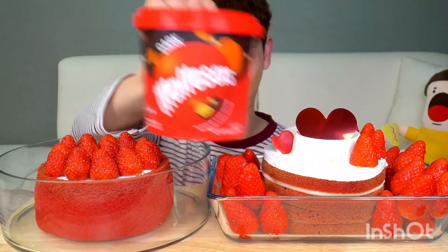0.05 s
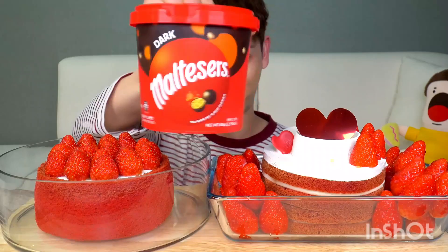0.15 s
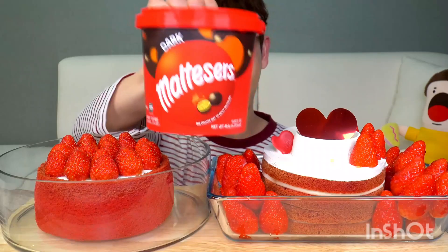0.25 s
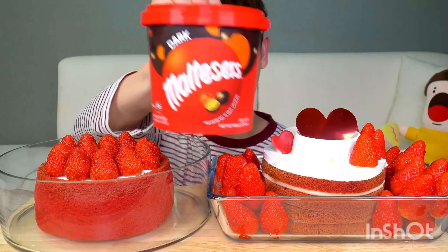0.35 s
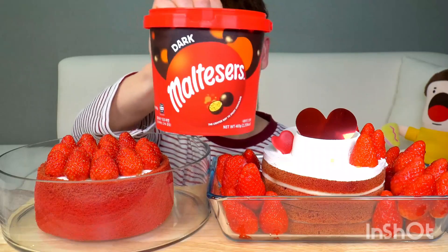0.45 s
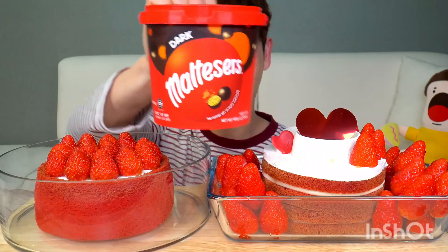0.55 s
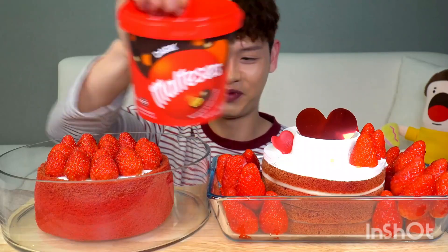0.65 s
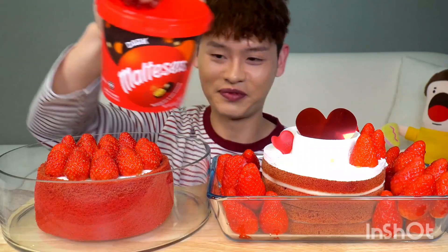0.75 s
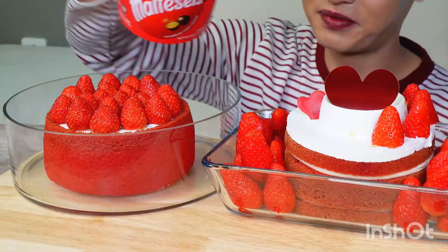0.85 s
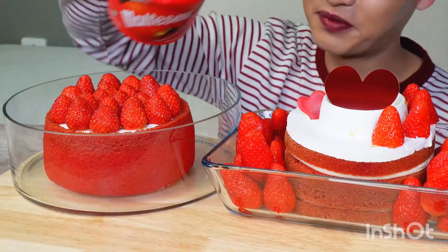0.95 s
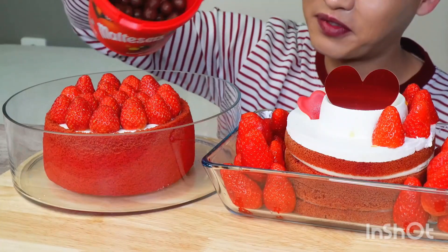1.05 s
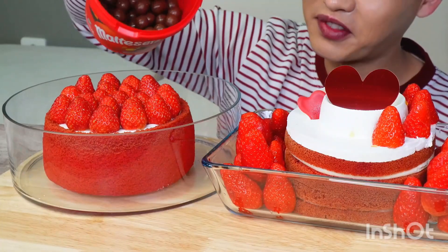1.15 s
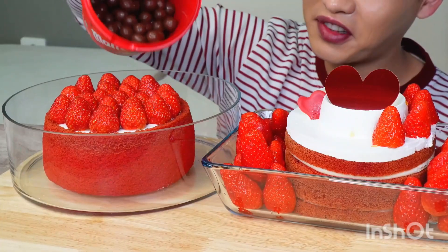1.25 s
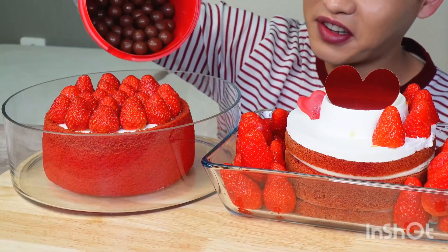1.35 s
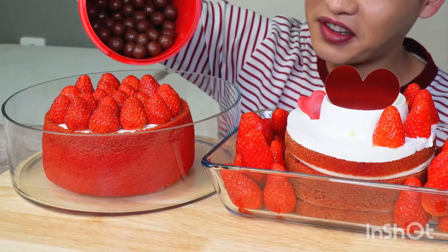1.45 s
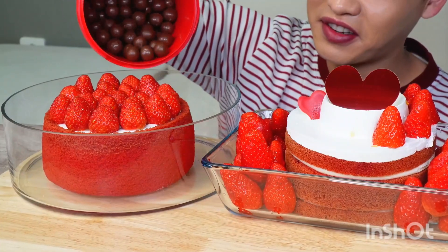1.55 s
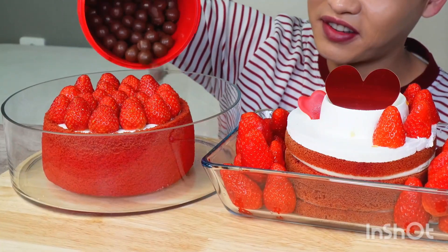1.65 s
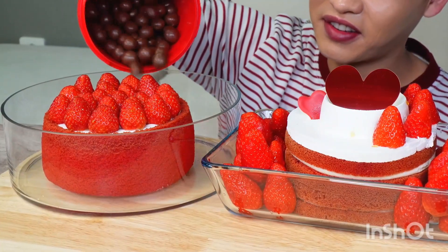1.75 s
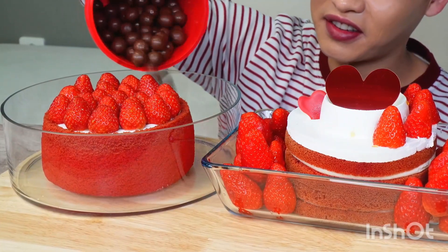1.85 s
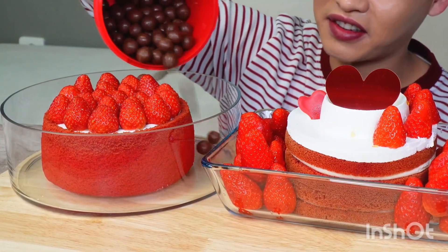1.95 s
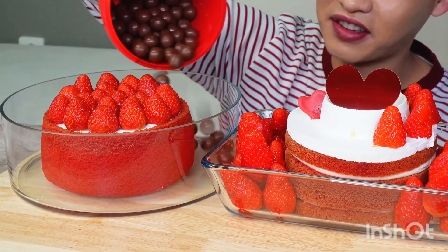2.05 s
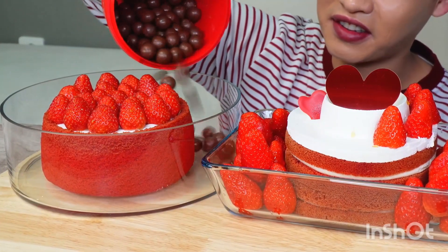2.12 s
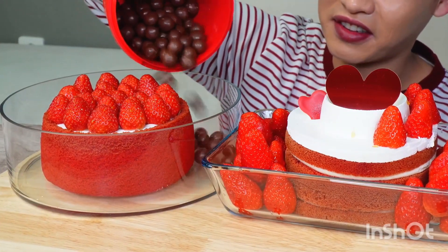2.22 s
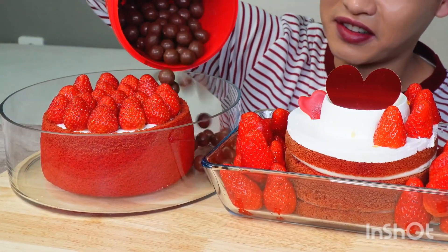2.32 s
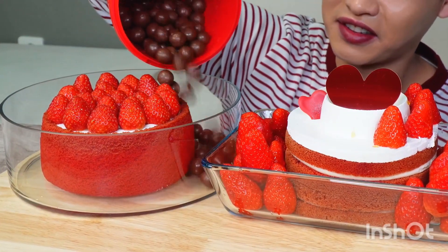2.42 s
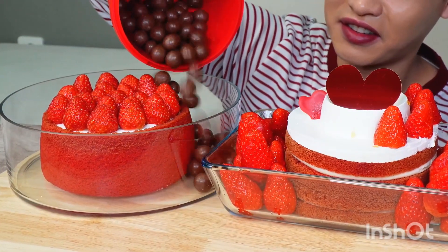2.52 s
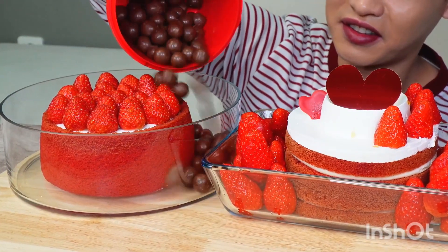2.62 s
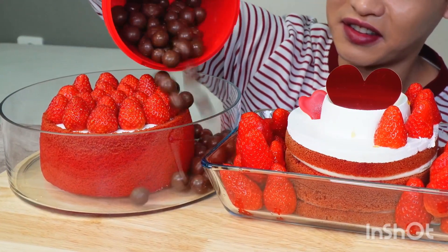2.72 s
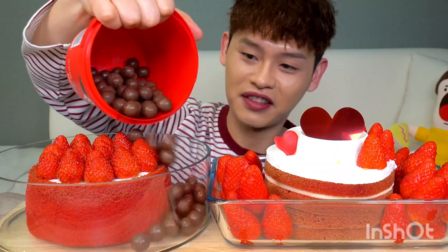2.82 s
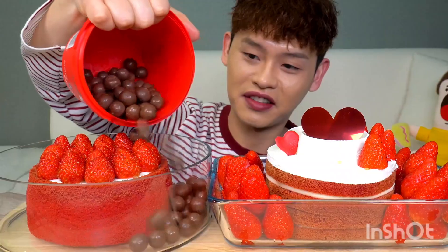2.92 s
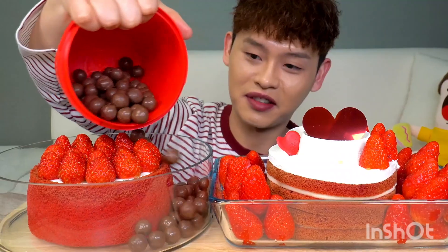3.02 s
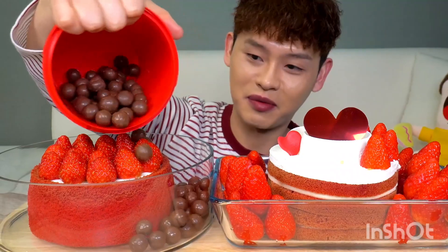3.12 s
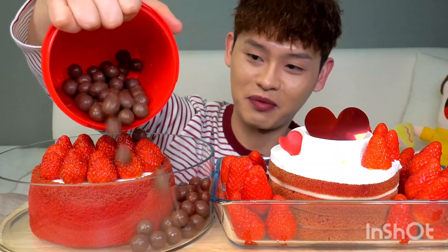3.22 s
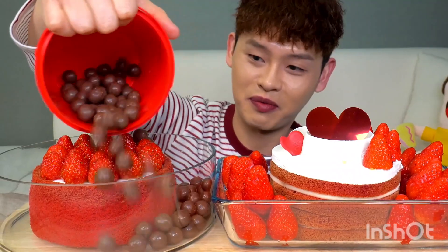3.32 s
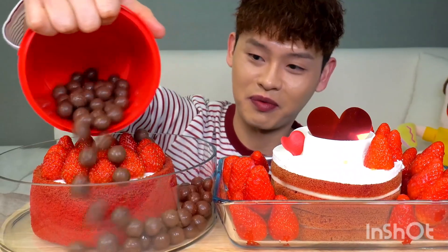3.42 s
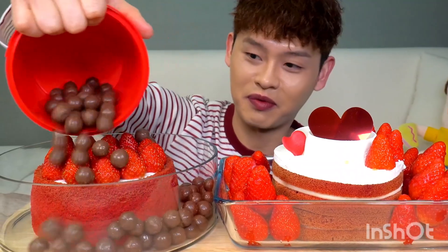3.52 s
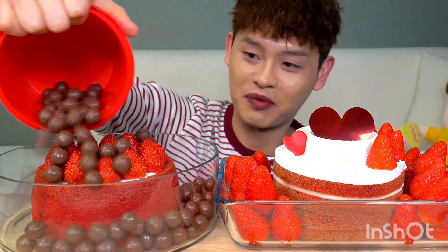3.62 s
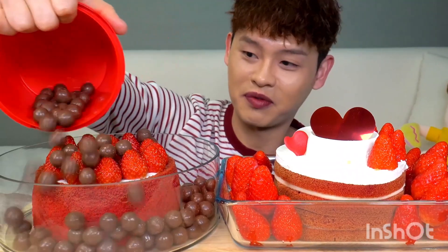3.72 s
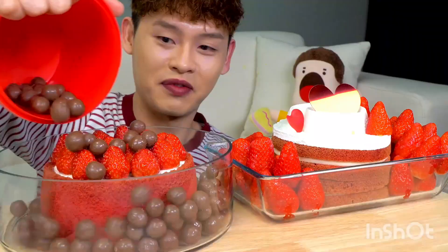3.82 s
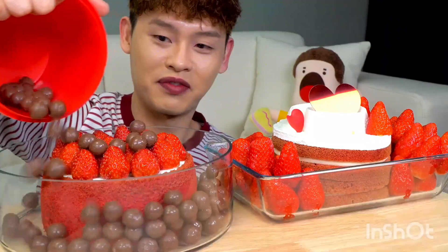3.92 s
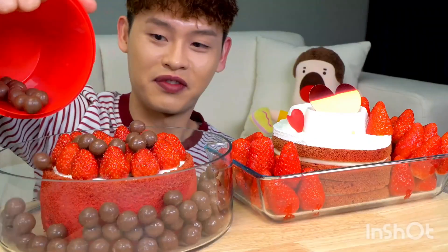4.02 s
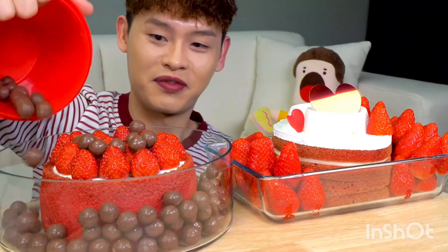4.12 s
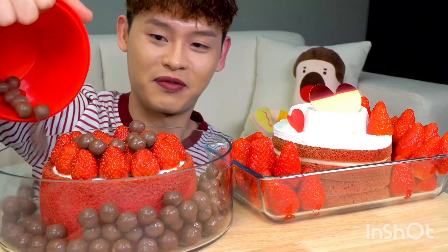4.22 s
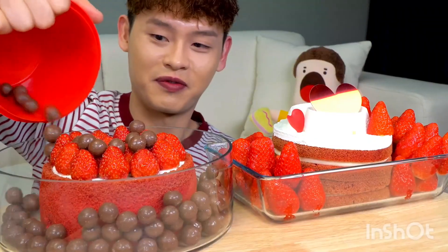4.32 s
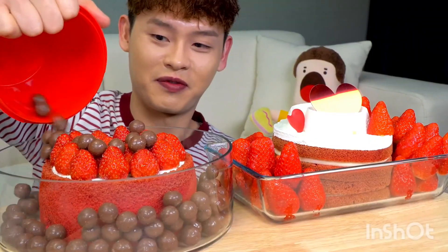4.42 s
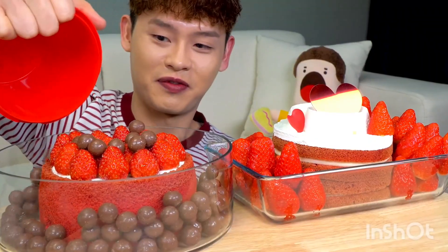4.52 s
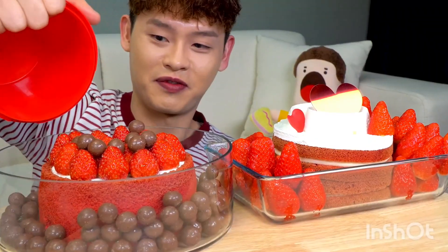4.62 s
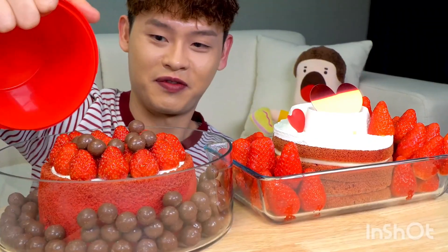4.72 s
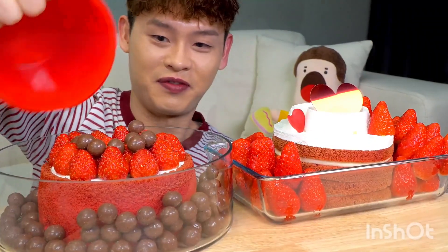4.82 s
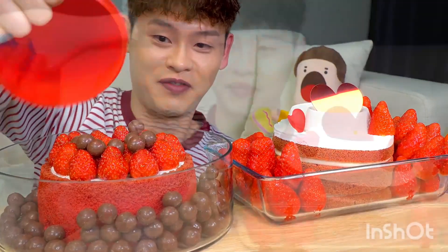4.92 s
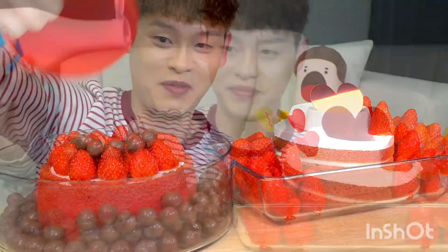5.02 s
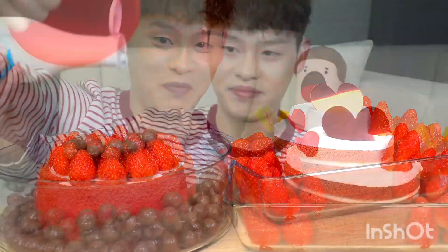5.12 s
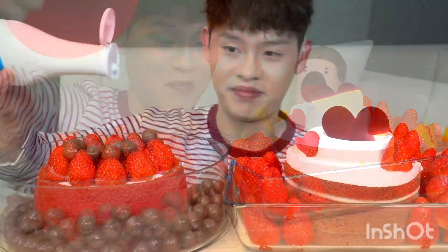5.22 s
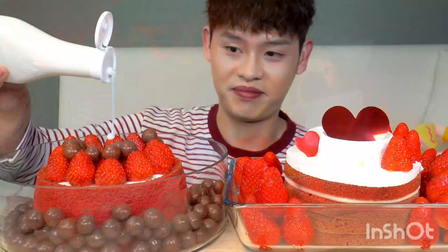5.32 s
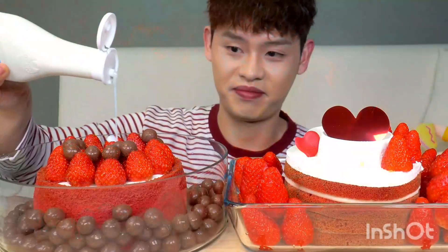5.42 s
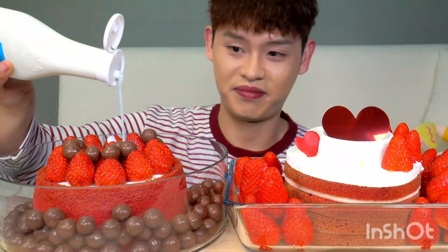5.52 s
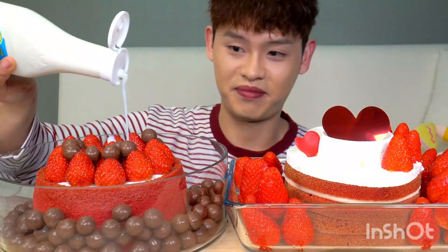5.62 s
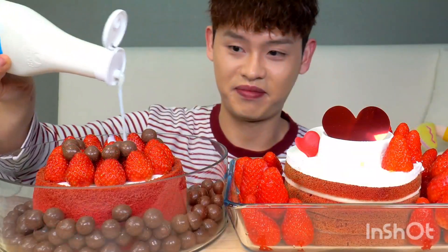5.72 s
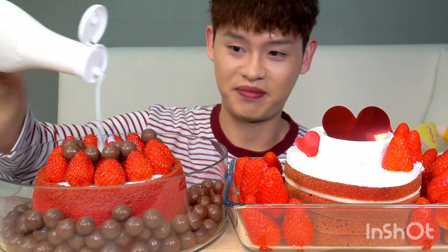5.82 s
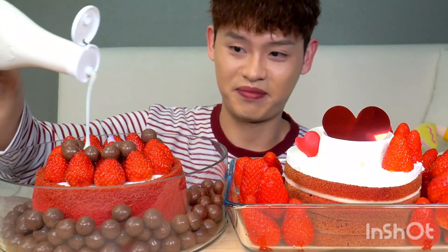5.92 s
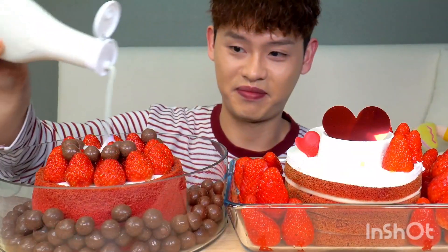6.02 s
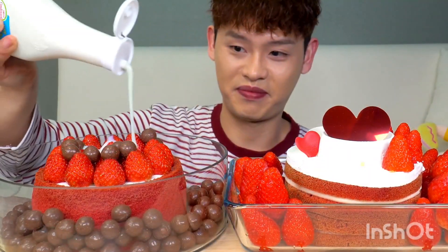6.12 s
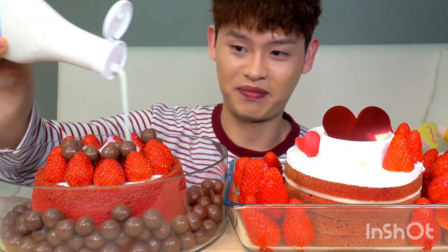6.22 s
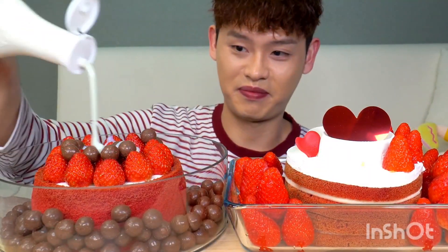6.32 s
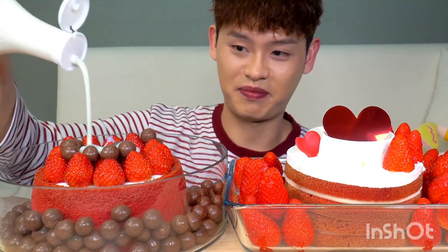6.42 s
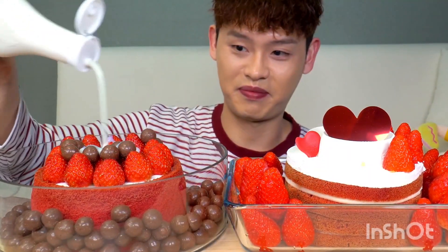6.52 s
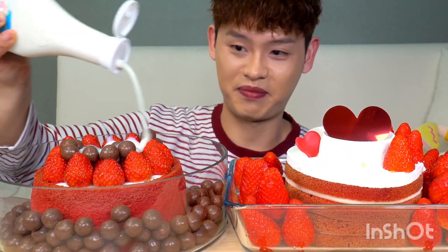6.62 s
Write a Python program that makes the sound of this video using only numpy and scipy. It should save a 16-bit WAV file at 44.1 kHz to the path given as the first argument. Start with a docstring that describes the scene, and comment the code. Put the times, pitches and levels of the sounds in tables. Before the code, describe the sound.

Close up, hard candy balls knock hollowly in plastic, pour ringing into glass, thin out to last clinks, then milk quietly trickles.

```python
"""Chocolate balls are shaken in a plastic tub, then clatter round a cake in a glass bowl, close to one microphone.
After the last balls settle, a thin stream of milk runs onto the cake with a soft low rumble.
Each collision is a short chatter of noise bursts that rings the tub or the glass; lesser balls rattle in between.
Soft plops, a faint rustle and lone ticks join in; milk and room tone are shaped noise and small clicks.
"""
import sys
import numpy as np
from scipy import signal
from scipy.fft import rfft, irfft
from scipy.io import wavfile
from scipy.ndimage import uniform_filter1d

SR = 44100
rng = np.random.default_rng(int(sys.argv[2]) if len(sys.argv) > 2 else 0)


def inscribe(sig):
    """Save sig as 16-bit PCM at rate SR to the path in sys.argv[1].

    A 1-D sig is mono; a 2-D sig holds one channel per row.
    Samples are clipped to [-1, 1] before scaling.
    """
    pcm = np.round(np.clip(np.atleast_2d(sig).T, -1, 1) * 32767)
    wavfile.write(sys.argv[1], SR, pcm.astype(np.int16))


N = 293661

# the clearest landings in the bowl, before the layer levels: t/s, clack level/dB, chatter length/s, clink f/Hz
BOWL_HITS = [(1.772, -18.5, .008, 3500), (1.831, -32, 0.01, 3600), (1.8425, -17, 0.0091, 3500),
             (1.882, -13, 0.024, 3670), (1.893, -24, 0.015, 3530), (1.925, -26, 0.014, 4620),
             (1.946, -13.5, 0.0032, 3680), (1.962, -16.5, 0.018, 4640), (1.988, -21.5, 0.0027, 3660),
             (2.022, -22, 0.018, 3600), (2.05, -13.5, .016, 3650), (2.0795, -18, 0.014, 6140),
             (2.094, -11.5, 0.011, 3900), (2.1205, -20, 0.015, 3670), (2.141, -17, 0.018, 3800),
             (2.188, -29, 0.0043, 5700), (2.2035, -19.5, 0.0041, 6150), (2.236, -30, .005, 6300),
             (2.256, -15, .004, 6000), (2.277, -25.5, 0.0073, 4420), (2.309, -18, .003, 3660),
             (2.331, -14, 0.0014, 4670), (2.379, -16.5, 0.005, 4400), (2.4, -26.5, 0.001, 6350),
             (2.431, -26.5, 0.015, 4640), (2.464, -23.5, 0.012, 4550), (2.51, -19, 0.0053, 4600),
             (2.548, -36.5, 0.0042, 4600), (2.566, -10.5, 0.0033, 6000), (2.658, -18.5, .007, 5830),
             (2.683, -22.5, 0.032, 6300), (2.701, -14.5, 0.0017, 4300), (2.745, -20, 0.0043, 4340),
             (2.782, -30, 0.013, 5660), (2.838, -22.5, 0.0073, 5800), (2.866, -25.5, 0.0052, 2660),
             (2.887, -16.5, 0.0093, 5600), (2.918, -42, 0.0024, 4500), (2.953, -21.5, 0.0082, 5700),
             (2.976, -23, 0.017, 5400), (3.006, -29, 0.0068, 4230), (3.037, -29.5, 0.0026, 4370),
             (3.054, -33.5, .001, 3630), (3.084, -33.5, 0.0091, 4840), (3.095, -16, 0.0044, 5800),
             (3.117, -38, 0.0022, 4500), (3.159, -33.5, .003, 3600), (3.165, -33, .003, 4600),
             (3.181, -35, .001, 5560), (3.202, -40.5, 0.0022, 2900), (3.217, -41, .001, 4340),
             (3.257, -46, 0.0018, 5900), (3.284, -42.5, 0.0088, 4750), (3.303, -36.5, 0.0026, 3200),
             (3.338, -27.5, 0.0063, 4500), (3.356, -31.5, .006, 4330), (3.385, -33, 0.0018, 4100),
             (3.412, -33.5, 0.0056, 5900), (3.42, -18, 0.0042, 4350), (3.447, -21.5, 0.017, 4500),
             (3.494, -24.5, .004, 5650), (3.507, -16, .003, 5750), (3.539, -33.5, .003, 5660),
             (3.561, -35.5, 0.034, 3860), (3.582, -23, 0.011, 3700), (3.611, -35.5, 0.0082, 4630),
             (3.626, -28, 0.0081, 6060), (3.671, -25.5, 0.013, 4950), (3.684, -19, 0.0061, 4440),
             (3.705, -32.5, .002, 3400), (3.7195, -21, .013, 4830), (3.754, -29.5, 0.0034, 4560),
             (3.789, -17, 0.0046, 4750), (3.801, -25.5, 0.028, 4740), (3.829, -22.5, 0.011, 6200),
             (3.863, -25.5, 0.0098, 4540), (3.935, -35, 0.0031, 4570), (3.994, -40, 0.0026, 3320),
             (4.005, -39.5, 0.0008, 4600), (4.026, -34, .001, 4600), (4.059, -31.5, 0.018, 4700),
             (4.079, -34, 0.0032, 4840), (4.114, -34.5, 0.0068, 4800), (4.181, -42.5, 0.00087, 4600),
             (4.208, -26.5, 0.019, 5600), (4.24, -35.5, 0.00073, 5500), (4.274, -28.5, 0.0082, 5650),
             (4.289, -29.5, 0.0037, 4900), (4.301, -32.5, 0.0038, 5600), (4.325, -32.5, .001, 4640),
             (4.335, -31, 0.0036, 5600), (4.347, -32, 0.0011, 3480), (4.366, -40.5, .002, 5800),
             (4.392, -29, 0.016, 5560), (4.419, -39, .001, 3680), (4.436, -43, .001, 5650),
             (4.453, -33, .002, 3260), (4.489, -37, .001, 4100), (4.575, -24.5, 0.015, 4400),
             (4.6045, -28.5, 0.0056, 4650), (4.62, -32.5, 0.015, 2950), (4.648, -32, 0.0031, 2950),
             (4.679, -29, 0.0023, 4500), (4.695, -34, 0.0017, 4600), (4.739, -34.5, .002, 4530),
             (4.748, -43, 0.00065, 4500), (4.759, -43, .001, 4530), (4.904, -47, 0.00062, 2920)]
# colour of the bright fizz of a contact: f/Hz, relative level/dB per Hz
FIZZ = [(5000, -26.5), (8200, 2), (9600, 2), (11000, -0.5), (15500, -4.5), (17000, -17)]
# colour of the low thud under a knock: f/Hz, relative level/dB per Hz
THUD = [(15, -13), (30, 5), (80, -5), (150, 0.5), (230, -0.5), (400, -19.5), (900, -56)]
MEDIUM_DB = -30  # clack level of a medium blow


def tub(clack_db=0, body_db=6, fizz_db=-3, jostle_db=-1, boom_db=5, jostle_fizz_db=-17, jostle_thud_db=-24):
    """Balls knock each other and the plastic wall; harder blows chatter longer."""
    # the clearest knocks, before the layer levels: t/s, clack level/dB, hollow body level/dB re clack
    tub_hits = [(0.021, -54, 6), (.063, -61, 19), (0.077, -47.5, 12.5), (0.114, -31.5, -12),
                (.123, -30, -6), (0.146, -34.5, 2), (0.161, -7, 3), (.174, -8.5, 2), (0.2164, -32.5, 6),
                (0.231, -19, -3), (.24, -20, -0.5), (0.28, -15.5, 3), (.286, -22.5, 1), (.303, -15.5, 4.5),
                (.335, -35, 17.5), (.372, -33, -4), (.381, -10.5, 3.5), (.396, -19, 4.5), (0.42, -24, 0),
                (.432, -41.5, 13), (.456, -37, 7.5), (.483, -33.5, 1.5), (.507, -50, 13.5),
                (.535, -47.5, 5), (0.546, -38.5, -3), (.559, -59, 18), (.586, -51, 17.5),
                (0.617, -55.5, 15), (.654, -39, -0.5), (.67, -54, 6), (.696, -59, 24), (.704, -36.5, 8),
                (.748, -57, 17.5), (.775, -64, 14), (.781, -40, 12), (0.801, -45.5, 15.5),
                (0.897, -54, 1.5), (.985, -51, 4), (1.012, -46.5, -4), (1.073, -42, 5), (1.092, -38.5, -4),
                (1.119, -35, -12), (1.146, -44, 11.5), (1.158, -33.5, -4), (1.179, -35.5, -4),
                (1.189, -36, 1), (1.201, -37.5, -9), (1.229, -46.5, 2.5), (1.291, -43.5, 8),
                (1.307, -44, 1), (1.323, -41.5, -23), (1.371, -43.5, 1), (1.396, -36, -13),
                (1.41, -31.5, -18), (1.443, -37, 5), (1.474, -37, -1), (1.515, -43, -12),
                (1.609, -51, 13.5), (1.622, -46, 6.5), (1.632, -33, -3), (1.677, -41, -9),
                (1.688, -39, 4.5), (1.698, -40, 1), (1.742, -33, 2.5)]
    # the mass of balls slides in surges: start t/s, end t/s, clack level/dB, body level/dB
    tub_surges = [(.12, .25, -42.5, -31), (.29, .43, -28, -24.5), (.5, .6, -68, -47.5),
                  (.71, .81, -62, -50.5), (1, 1.06, -73, -51), (1.1, 1.2, -44, -38.5),
                  (1.28, 1.33, -48.5, -42), (1.4, 1.44, -44.5, -41.5), (1.48, 1.54, -59, -51),
                  (1.665, 1.755, -51.5, -42.5)]
    # colours of the clack and of the hollow body: f/Hz, relative level/dB per Hz
    tub_clack = [(900, -43.5), (1900, -11.5), (3000, 3), (4200, 1.5), (5800, 1), (7400, -5.5), (9000, -15),
                 (14000, -58)]
    tub_body = [(60, -26), (200, -27.5), (350, -12), (550, 3.5), (950, 1.5), (1500, 3), (2400, 4.5),
                (3500, -28), (6000, -57)]
    # a harder blow is brighter: fizz level/dB re clack for a medium blow, change/dB per dB of force
    tub_fizz_rule = (-13.5, 0.29)
    medium_chatter_s, chatter_db_per_db = 0.0028, 0.5
    middle_clink_hz, clink_octaves = 3880, 0.35

    jostle, boom = surges(tub_surges, rise_db_per_s=492.5, swell_db=-1.5, fall_db_per_s=331)
    pushes = boom * amp(boom_db) * rattle(tub_body, per_s=500, decay=0.00082, spread_db=2.5)
    out = jostle * amp(jostle_db) * rattle(tub_clack, per_s=640, decay=0.0032, spread_db=7.0)
    out += jostle * amp(jostle_fizz_db) * rattle(FIZZ, per_s=550, decay=0.0022, spread_db=6.0)
    thuds = boom * amp(jostle_thud_db) * rattle(THUD, per_s=270, decay=0.0088, spread_db=3)
    # the balls differ in pitch
    clinks = middle_clink_hz * 2 ** (clink_octaves * rng.uniform(-0.57, 1, len(tub_hits)))
    for (s, db, body_rel), hz in zip(tub_hits, clinks):
        length = medium_chatter_s * amp(chatter_db_per_db * (db - MEDIUM_DB))
        clack, body, fizz, thud = collision(
            db, length, hz, body_rel, by_force(tub_fizz_rule, db), tub_clack, tub_body,
            decay=0.0025, fizz_decay=0.0078, body_decay=0.0025, clink_db=3, thud_db=-34.5)
        add(out, s, amp(clack_db) * clack + amp(fizz_db) * fizz)
        add(thuds, s, thud)
        add(pushes, s, amp(body_db) * body)
    return out + tub_wall(pushes, thuds)


def tub_wall(push, thuds, direct_db=-14):
    """The tub booms briefly after every knock, its pitch wavering as the balls shift."""
    # notes of the tub's air and wall: f/Hz before tipping and waver, width/Hz, level/dB before the boom level
    tub_modes = [(644, 63, 3), (1320, 240, -8), (2276, 99, -30)]
    # tipping turns the mouth away, then the balls crowd it and lower its pitch: t/s, pitch factor, boom level/dB
    tipping = [(0, 1, 0.5), (.82, 1, 0), (1.05, 0.99, -10), (1.35, 0.93, -15), (1.43, 0.788, 3),
               (1.62, 0.73, 6), (1.76, 0.75, -3)]
    waver = 0.016  # rms share of the pitch

    s, *columns = np.transpose(tipping)
    pitch, boom_db = (np.interp(np.arange(N) / SR, s, c) for c in columns)
    wander = evened(uniform_filter1d(rng.standard_normal(N), size=1024))
    pitch = pitch * (1 + waver * wander)
    ringing = sum(amp(db) * glide(push, hz * pitch, width) for hz, width, db in tub_modes)
    return amp(boom_db) * (thuds + ringing) + amp(direct_db) * push


def bowl(clack_db=-5.0, body_db=-3.5, fizz_db=-2, jostle_db=-7, roll_db=-4,
         jostle_fizz_db=-17, jostle_thud_db=-23):
    """Balls clatter on glass and on each other; contacts feed the bowl's notes and shake the table."""
    # the mass of balls slides into the bowl in surges: start t/s, end t/s, clack level/dB, body level/dB
    bowl_surges = [(1.8, 2.36, -34, -44.5), (2.39, 3, -31, -38.5), (3.27, 3.3, -54, -52.5),
                   (3.42, 3.59, -27, -35.5), (3.76, 3.86, -27, -37), (3.96, 4.1, -43.5, -46.5),
                   (4.28, 4.45, -44, -48.5), (4.59, 4.72, -45.5, -53.5)]
    # ring, table thud and hollowness of the landings rise and fall as the bowl fills:
    # t/s, ring level/dB, thud level/dB, body level/dB
    filling = [(1.76, -4, 6.5, -1.5), (2.3, -1, 4.5, -5.5), (2.75, -1, -0.5, -3.5), (3.2, 3.5, -5, 4),
               (3.85, 1, -4, -2), (4.3, -9.5, 3.5, -2), (4.6, -5, -17, -6), (4.92, -8, 14, -3.5)]
    # colours of the clack and of the hollow body: f/Hz, relative level/dB per Hz
    bowl_clack = [(900, -44), (1900, 2.5), (2700, 5), (3600, 6), (4600, 3), (5800, 7), (7400, 1.5),
                  (8300, -22), (13000, -48.5)]
    bowl_body = [(60, -40), (170, -15), (280, 3.5), (550, 2), (950, 5), (1500, 9.5), (2000, -2),
                 (3500, -46.5)]
    # body and fizz of a blow: level/dB re clack for a medium blow, change/dB per dB of force
    body_rule = (-7.5, -0.27)
    fizz_rule = (-14.5, 0.3)

    jostle, roll = surges(bowl_surges, rise_db_per_s=455, swell_db=2.0, fall_db_per_s=166)
    ring_gain, thud_gain, body_gain = levels(filling)
    hits = jostle * amp(jostle_db) * rattle(bowl_clack, per_s=690, decay=0.00094, spread_db=3.5)
    hits += jostle * amp(jostle_fizz_db) * rattle(FIZZ, per_s=370, decay=0.0081, spread_db=6)
    hits += roll * amp(roll_db) * rattle(bowl_body, per_s=450, decay=0.0047, spread_db=3.0)
    table = jostle * amp(jostle_thud_db) * rattle(THUD, per_s=190, decay=0.0029, spread_db=5)
    for s, db, length, hz in BOWL_HITS:
        clack, body, fizz, thud = collision(
            db, length, hz, by_force(body_rule, db), by_force(fizz_rule, db), bowl_clack, bowl_body,
            decay=0.0032, fizz_decay=0.0068, body_decay=0.0071, clink_db=3.0, thud_db=-24)
        body = amp(body_db) * body_gain[round(s * SR)] * body
        add(hits, s, amp(clack_db) * clack + body + amp(fizz_db) * fizz)
        add(table, s, thud)
    return hits + glass(hits * ring_gain) + table * thud_gain


def glass(push, vary_db=6):
    """The bowl rings; where each ball lands decides how strongly it wakes each note."""
    # notes of the glass: f/Hz, width/Hz unless the load widens it,
    # level/dB while the balls land at one side, level/dB once they roll all round
    glass_modes = [(548, 33.4, 5.5, 11), (814, 67, -13, 6.5), (1383, 32, 7.5, -13), (1705, 22, -5, 8.5),
                   (2132, 63, 13.5, -4), (2270, 15.3, 5, 13), (2984, 7.4, -31, 10.5),
                   (3190, 63, -4.5, -1.5), (3680, 120, 10, -4), (3718, 20, -10, 11.5), (4537, 72, 16, 6),
                   (4613, 65, -3, 9.5), (5140, 38, 9.5, -16), (5705, 130, 1.5, 4.5), (5510, 38, 11.5, -11),
                   (6290, 18, 18.5, -11), (6780, 29, 5, 6.5), (7340, 30, 11, 8), (7840, 33, 7, 8.5)]
    # the balls spread round the bowl between these times: t/s
    spread_times = (1.6, 3.12)
    load_loss = 0.006  # the load of balls damps the glass: least width of a note as a share of its pitch

    t = np.arange(N) / SR
    spread = np.interp(t, spread_times, [0, 1])
    latest = np.searchsorted([row[0] for row in BOWL_HITS], t)  # which landing came last
    places = amp(vary_db * rng.uniform(-1.1, 1, (len(BOWL_HITS) + 1, len(glass_modes))))
    out = np.zeros(N)
    for place, (hz, width, side, around) in zip(places.T, glass_modes):
        strength = amp(side) * (1 - spread) + amp(around) * spread
        out += resonate(push * place[latest] * strength, hz, max(width, load_loss * hz))
    return out


def collision(db, length, hz, body_rel, fizz_rel, clack, body, decay, fizz_decay, body_decay,
              clink_db, thud_db, clink_width=420):
    """One collision in parts: the clack of the shells with their clink, hollow body, bright fizz, thud."""
    shell = chatter(clack, length, decay)
    clink = resonate(shell, hz, clink_width)
    return (sized(shell + amp(clink_db) * clink, db),
            sized(chatter(body, length, body_decay), db + body_rel),
            sized(chatter(FIZZ, length, fizz_decay), db + fizz_rel),
            sized(chatter(THUD, length, decay=0.011, size=4096), db + body_rel + thud_db))


def chatter(colour, length, decay, contacts_per_s=900, rise=0.00035, size=2048):
    """A first contact and quick rebounds, each a fast-dying burst (length, decay and rise in s)."""
    t = np.arange(size) / SR
    contacts = (rng.random(size) < contacts_per_s / SR) * (t < length) * rng.uniform(.3, 1, size)
    contacts[0] = 1 + decay * contacts_per_s / 2
    power = signal.lfilter([1], [1, -np.exp(-2 / (decay * SR))], contacts)
    return noise(colour, size) * np.sqrt(power) * (1 - np.exp(-t / rise))


def rattle(colour, per_s, decay, spread_db, count=16):
    """Many small contacts of unequal size at random times, each ball with its own click."""
    size = amp(spread_db * np.minimum(rng.exponential(1, N), 3)) * (rng.random(N) < per_s / SR)
    ball, out = rng.integers(0, count, N), np.zeros(N)
    clicks = [evened(chatter(colour, 0, decay)) for _ in range(count)]
    for at in np.flatnonzero(size):
        add(out, at / SR, size[at] * clicks[ball[at]])
    return evened(out)


def surges(rows, rise_db_per_s, swell_db, fall_db_per_s):
    """Gains of clack and body: each surge builds up, changes by swell_db while it lasts and dies away."""
    t, gains = np.arange(N) / SR, np.zeros((2, N))
    for start, end, *dbs in rows:
        shape = swell_db * np.interp(t, [start, end], [-.5, .5])
        shape -= rise_db_per_s * np.maximum(start - t, 0)
        shape -= fall_db_per_s * np.maximum(t - end, 0)
        gains = np.maximum(gains, amp(dbs)[:, None] * amp(shape))
    return gains


def by_force(rule, db):
    """The level of one part of a collision, in dB re its clack, follows the force of the blow."""
    medium, slope = rule
    return medium + slope * (db - MEDIUM_DB)


def plops(decay=0.0046, size=4096):
    """Balls drop on something soft: a few low cycles that swell and die."""
    # soft landings: t/s, level/dB, f/Hz
    plop_hits = [(1.629, -39.5, 300), (2.435, -38, 338), (2.51, -33.5, 414), (2.631, -37, 307),
                 (2.818, -49, 300), (2.861, -39, 300), (3.36, -37, 275), (3.385, -45, 263),
                 (3.706, -41, 338)]
    out, t = np.zeros(N), np.arange(size) / SR
    for s, db, hz in plop_hits:
        swell = np.sqrt(t) * np.exp(-t / decay)
        add(out, s, sized(np.sin(2 * np.pi * hz * t) * swell, db))
    return out


def milk():
    """The stream drums softly on the cake, with a faint patter and a thin hiss above."""
    # colours of the drumming, the patter and the hiss: f/Hz, relative level/dB per Hz
    rumble = [(20, -30), (45, -13), (85, 3), (130, -10.5), (180, -5.5), (280, -15.5), (450, -23.5),
              (900, -61)]
    splash = [(200, -12.5), (450, 2), (1000, -6.5), (1800, -16), (3500, -35.5), (8000, -42)]
    milk_hiss = [(2000, -21.5), (6500, -9.5), (8700, 0.5), (10200, -5), (11500, 3.5), (14800, 3.5),
                 (16500, -2)]
    drumming = stream(db=-48.5, fade_db_per_s=4) * noise(rumble, N)
    hiss = stream(db=-66.5, fade_db_per_s=5.5) * noise(milk_hiss, N)
    patter = stream(db=-59, fade_db_per_s=10) * rattle(splash, per_s=1200, decay=0.0089, spread_db=3.5)
    return drumming + hiss + patter


def stream(db, fade_db_per_s):
    """Gain of one milk layer: the stream lands quickly, then softens as the cake gets wet."""
    start_s, rise_s = 5.15, 0.008
    t = np.maximum(np.arange(N) / SR - start_s, 0)
    return np.minimum(t / rise_s, 1) * amp(db - fade_db_per_s * t)


def rustle():
    """A faint dry rubbing, made of many small contacts, as the hand moves the tub."""
    # colour of the rubbing: f/Hz, relative level/dB per Hz
    rubbing = [(500, -5), (1500, 0.5), (3200, -1), (5200, -8), (8000, -28), (16000, -39)]
    # the emptied tub is drawn away: t/s, level/dB
    rustle_level = [(4.78, -59.5), (4.87, -54), (4.93, -82), (5.0, -68.5), (5.08, -69), (5.15, -93)]
    return levels(rustle_level)[0] * rattle(rubbing, per_s=580, decay=0.0053, spread_db=8.5)


def ticks(size=4096):
    """Lone ticks and bursting bubbles, each a dying band of noise."""
    # t/s, level/dB, middle f/Hz, reach to each side/octaves, decay/s
    lone_ticks = [(5.117, -54.5, 6430, 0.95, 0.0026), (5.868, -57, 13200, 0.28, 0.0029),
                  (6.061, -67, 2740, 0.17, 0.012), (6.41, -55, 3040, 0.33, 0.0021)]
    out, t = np.zeros(N), np.arange(size) / SR
    for s, db, hz, octaves, decay in lone_ticks:
        near, far = 2 ** octaves, 8 ** octaves
        colour = [(hz / far, -40), (hz / near, -4), (hz, 0), (hz * near, -4), (hz * far, -40)]
        add(out, s, sized(noise(colour, size) * np.exp(-t / decay), db))
    return out


def still_room(level_db=-69.5):
    """The quiet background of the room is steady shaped noise."""
    # colour of the still room: f/Hz, relative level/dB per Hz
    floor = [(20, -10.5), (80, -1.5), (200, -2.5), (600, -5.5), (1500, -16), (4000, -21), (16000, -30)]
    return amp(level_db) * noise(floor, N)


def room(x, wet_db=-16, delay=0.0016):
    """A small furnished room adds a faint noise tail that dies at its own pace in each pitch range."""
    # f/Hz, time to fall by 60 dB/s
    fade_times = [(150, 0.047), (550, 0.18), (1400, 0.1), (4000, 0.098), (10000, 0.02)]
    hz, t, z = signal.stft(rng.standard_normal(SR // 2), SR, nperseg=256)
    fade = amp(-60 * t / read(fade_times, hz)[:, None])
    tail = signal.istft(z * fade, SR, nperseg=256)[1]
    tail *= np.arange(len(tail)) / SR > delay
    return x + amp(wet_db) * signal.fftconvolve(x, tail / np.linalg.norm(tail))[:N]


def amp(db):
    """Decibels to gain."""
    return 10 ** (np.asarray(db) / 20)


def evened(x):
    """Scales to rms 1."""
    return x / np.sqrt(np.mean(x ** 2) + 1e-20)


def sized(x, db):
    """Scales a short sound to the energy of a hundredth of a second at this level."""
    return amp(db) * x * np.sqrt(SR / 10 ** 2 / (np.sum(x ** 2) + 1e-20))


def read(points, hz):
    """Reads a table on a log-frequency axis."""
    f, value = np.transpose(points)
    return np.interp(np.log(hz + 1), np.log(f + 1), value)


def levels(rows):
    """Smoothed gain curves from rows of dB, silent outside their span."""
    s, *columns = np.transpose(rows)
    t = np.arange(N) / SR
    curves = [np.interp(t, s, c, left=-np.inf, right=-np.inf) for c in columns]
    return [uniform_filter1d(amp(curve), size=256) for curve in curves]


def add(mix, s, sound):
    """Adds a sound into the mix at a time in seconds."""
    part = mix[max(round(s * SR), 0):][:len(sound)]
    part += sound[:len(part)]


def noise(colour, size):
    """Noise of rms 1 with a given spectrum."""
    gain = amp(read(colour, np.fft.rfftfreq(size, 1 / SR)))
    return evened(irfft(rfft(rng.standard_normal(size)) * gain, size))


def resonate(x, hz, width):
    """One ringing note, with gain 1 at its centre."""
    return signal.lfilter(*signal.iirpeak(hz, hz / width, SR), x)


def glide(x, hz, width):
    """A ringing note whose pitch follows a curve, with gain 1 at its centre."""
    turn = np.exp(2j * np.pi * np.cumsum(hz) / SR)
    r = np.exp(-np.pi * width / SR)
    # shift the note down to 0 Hz, smooth there, and shift it back up
    return 2 * (turn * signal.lfilter([1 - r], [1, -r], x / turn)).real


def scene():
    """All sources reach one microphone, heard alike in both ears."""
    close = tub() + bowl() + plops() + rustle() + ticks()
    mono = room(close) + milk() + still_room()
    return np.array([mono, mono])


def record(dry, threshold_db=-23, squeeze=0.88, release_db_per_s=500):
    """A fast compressor flattens the loudest clatter; then a low-pass removes the very top."""
    edge_hz = 15900
    power_db = 10 * np.log10(abs(uniform_filter1d(dry[0] ** 2, size=64)) + 1e-12)
    fall = np.arange(N) * release_db_per_s / SR
    # hold each peak, letting it sink at the release rate
    held_db = np.maximum.accumulate(power_db + fall) - fall
    over_db = np.maximum(held_db - threshold_db, 0)
    squeezed = dry / amp(np.clip(squeeze, 0, 1) * uniform_filter1d(over_db, size=24))
    low_pass = signal.firwin(301, edge_hz, window=("kaiser", 9), fs=SR)
    return signal.oaconvolve(squeezed, low_pass[None], "same")


dry = scene()
out = record(dry)
inscribe(out)
```